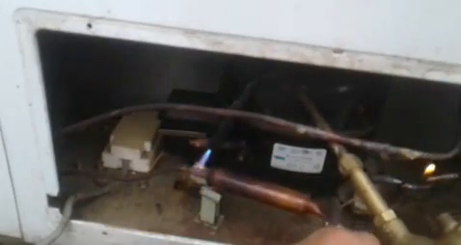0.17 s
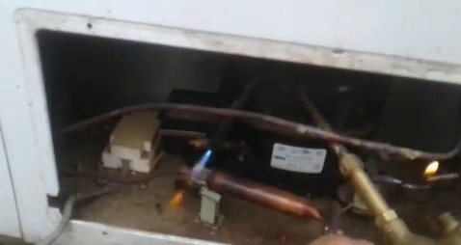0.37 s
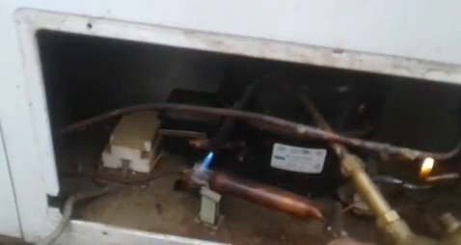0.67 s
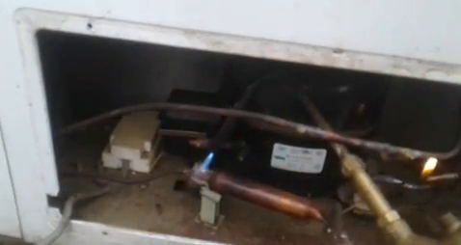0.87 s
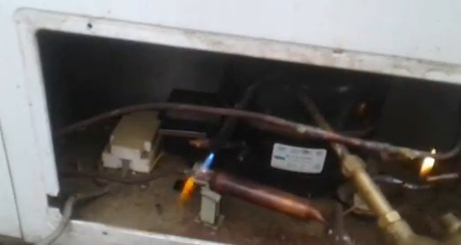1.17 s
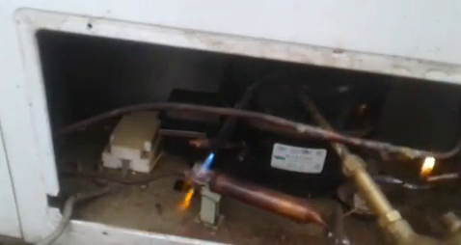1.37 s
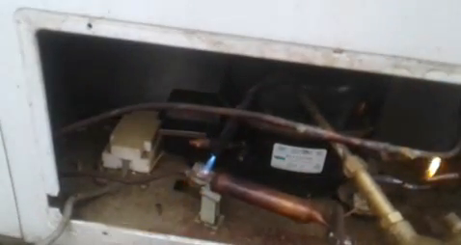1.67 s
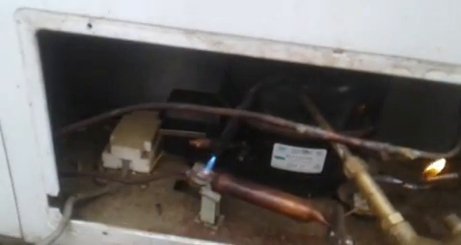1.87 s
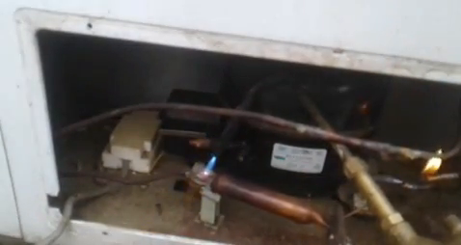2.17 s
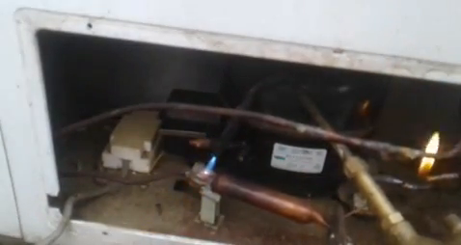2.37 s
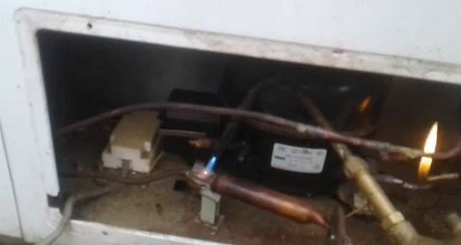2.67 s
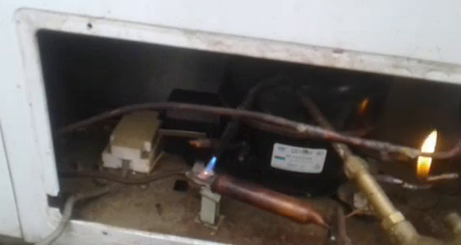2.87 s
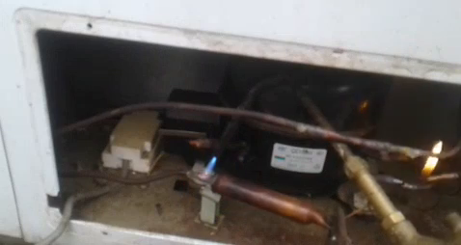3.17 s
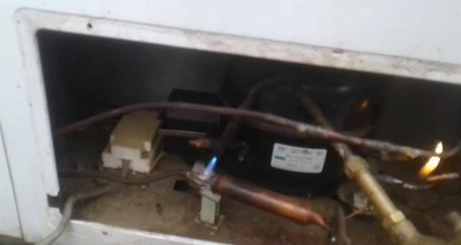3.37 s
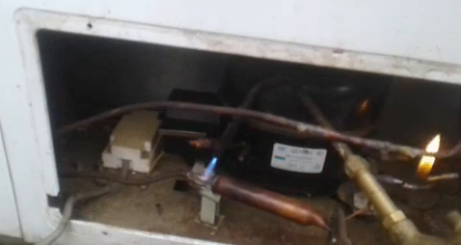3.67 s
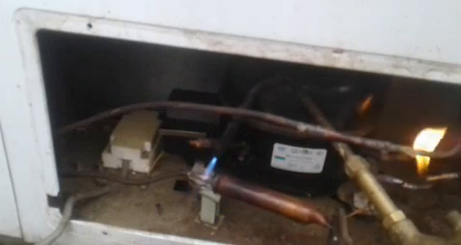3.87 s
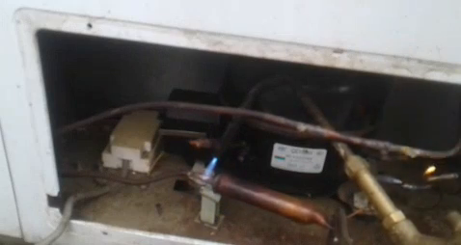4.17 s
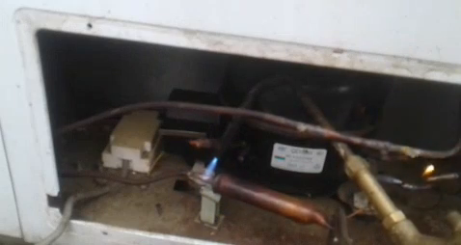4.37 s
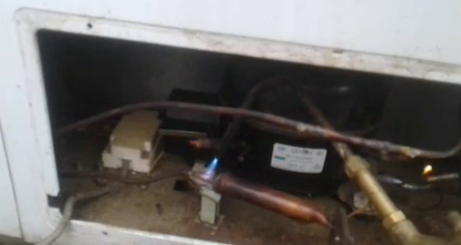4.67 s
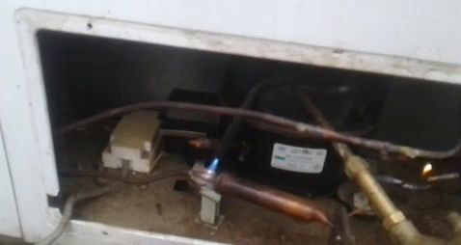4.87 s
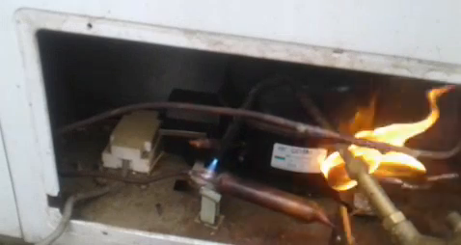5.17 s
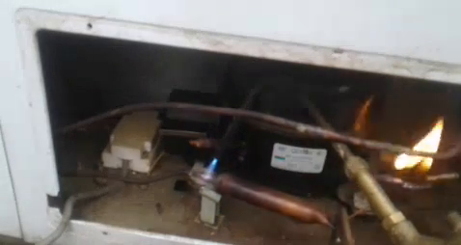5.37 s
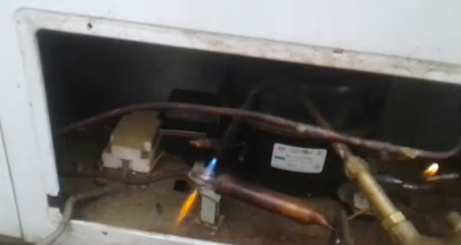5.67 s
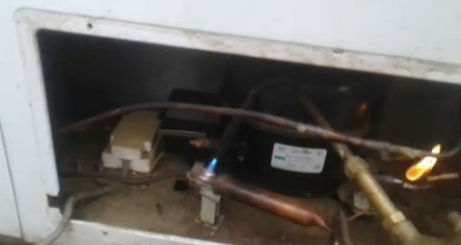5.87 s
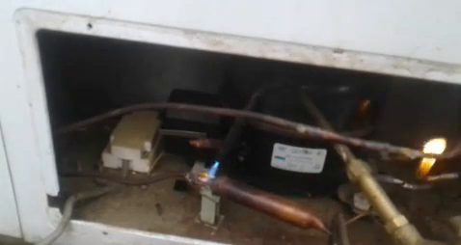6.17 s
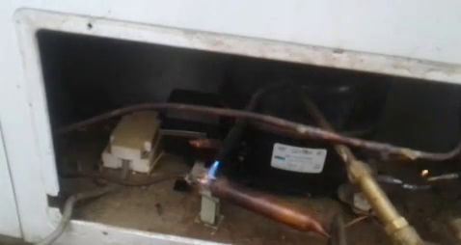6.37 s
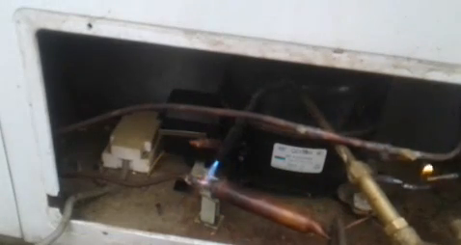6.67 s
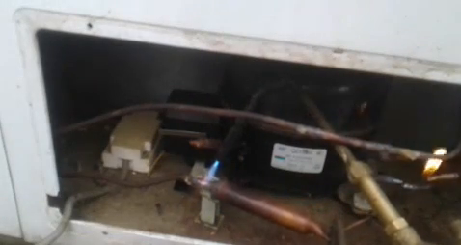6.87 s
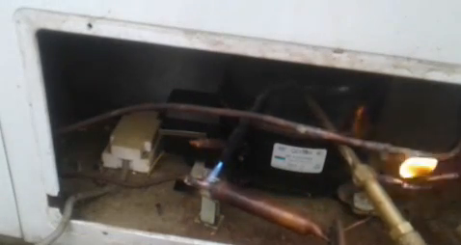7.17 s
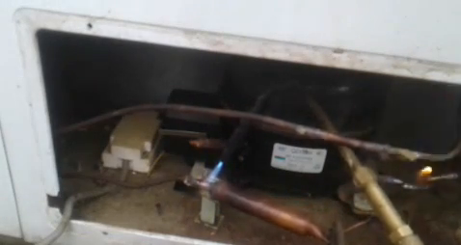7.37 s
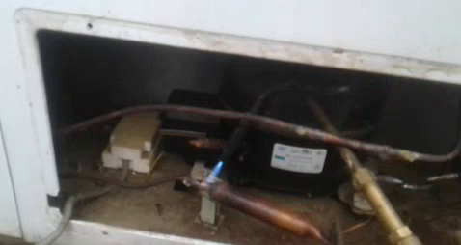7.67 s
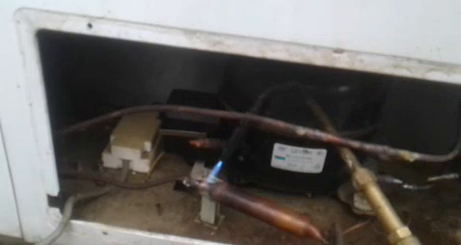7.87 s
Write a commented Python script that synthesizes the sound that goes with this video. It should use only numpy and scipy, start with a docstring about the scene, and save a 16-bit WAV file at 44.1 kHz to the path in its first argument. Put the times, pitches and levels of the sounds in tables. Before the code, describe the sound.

From 0 to 8 seconds a gas torch burns continuously against copper pipework inside an open metal refrigeration compartment. The dominant sound is a dense, bright, high hiss with a sizzling edge and countless tiny spits, so it feels grainy rather than smooth. Far beneath are a thin midrange rush and a very soft, low, fluttering flame roar. Everything surges together by small amounts: a slight lift near 0.8, a dip around 1.1, quick wavers until 4.3, a livelier swell, dip and swell from 5.4 to 5.8, another lift near 7.2 and a sag at 7.9. Narrow whistling tints in the hiss swell and fade as the flame shifts, with subtle gliding hollow reflections. Extremely faint low puffs come near 1.7, 5.1, 7.5 and 7.8. The microphone is close, the sound centred, and the hiss never stops.

```python
"""A hand-held gas torch heats a copper pipe joint inside the open steel compartment of a refrigeration unit.
From the start the jet hisses, rushes and spits finely (turbulent noise with sharp impulses) and the flame
roars softly (low-band noise); all surge together, and compartment resonances and gliding echoes colour the jet.
As the torch creeps along the joint, pitches in the hiss swell and fade; four faint low puffs (short swells
of band noise) come near 1.7, 5.1, 7.5 and 7.8 s. One microphone, close by, feeds both channels."""
import sys
import numpy as np
from scipy import signal
from scipy.fft import rfft, irfft, next_fast_len
from scipy.io import wavfile
from scipy.ndimage import map_coordinates

SR = 44100
rng = np.random.default_rng(int(sys.argv[2]) if len(sys.argv) > 2 else 0)


def generate_wav(signal):
    """Clip the signal to [-1, 1] and save it as 16-bit WAV at the path in sys.argv[1]."""
    frames = np.transpose(np.atleast_2d(signal))
    scaled = np.clip(frames, -1, 1) * 32767
    pcm = np.round(scaled).astype(np.int16)
    wavfile.write(sys.argv[1], SR, pcm)


N = 352932
TIME = np.arange(N) / SR   # s

# strength of the flame, which surges and sinks as it licks round the joint: time_s, strength_db (0 = usual)
FLAME_STRENGTH = [(0.0, 0.2), (0.76, 1), (1.08, -1.8), (1.2, 0.2), (1.74, -1), (1.86, 1.1), (2.02, -0.8),
                  (2.54, 0), (2.64, -1.5), (2.86, 0.8), (2.98, -0.5), (3.32, 0.1), (3.54, -1), (3.88, 1.0),
                  (4.16, -0.4), (4.26, 1), (4.46, -0.4), (5.16, -0.3), (5.26, -1.3), (5.44, 1.8),
                  (5.56, -1.6), (5.74, 2), (5.84, -0.1), (6.12, -0.6), (7.06, -0.25), (7.24, 1.5),
                  (7.88, -1.3), (7.98, 0.4)]
# the torch creeps along the joint, now faster, now slower: time_s, place_0_to_1
TORCH_PLACE = [(0, 0.1), (.5, 0.16), (1.5, 0.18), (1.9, 0.31), (3.2, 0.41), (3.7, 0.55), (5.8, 0.57),
               (6.5, 0.8), (7.0, 0.76), (7.25, 0.86), (8, 0.95)]
# spectrum of the free jet: frequency_hz, level_db
JET_SPECTRUM = [(200, -25.5), (380, -20.5), (480, -25), (650, -12), (1000, -17), (2000, -24), (3200, -12.5),
                (5000, -6.5), (6500, -1.5), (8000, -3), (10000, -1), (13000, -0.3), (15600, 0.5)]
# pitches that swell or fade when the jet meets one place on the joint: place_0_to_1, pitch_hz, width_hz, change_db
PLACE_PITCHES = [(.06, 6740, 260, 5.5), (.09, 7360, 180, 4), (.06, 5380, 160, -8), (.11, 6160, 170, -5),
                 (.17, 11430, 230, 7), (.32, 11580, 380, -10), (.58, 6860, 326, -5), (.58, 9500, 350, -3.5),
                 (.59, 12700, 530, 1), (.74, 14300, 160, 7), (.88, 8100, 160, -8.5), (.89, 5500, 280, 4),
                 (.9, 7300, 300, -6.5), (.96, 13240, 420, 9), (.99, 12600, 380, -6), (1, 4420, 140, 2.5),
                 (1, 10960, 190, 7.5)]
# resonances of the compartment: pitch_hz, width_hz, boost_db
COMPARTMENT_RESONANCES = [(692, 118, 3), (882, 120, 8), (1170, 227, 15), (1457, 43, 7.5), (1664, 130, 11.5),
                          (1949, 236, 14), (2089, 162, 13), (2545, 410, 11), (2784, 180, 15.5),
                          (3115, 154, 11.5), (3337, 57, 12), (3568, 89, 11.5), (3726, 282, 16),
                          (4090, 203, 10.5), (4368, 156, 10), (4685, 440, 10), (4870, 51, 12),
                          (5122, 89, 15.5), (5397, 143, 10), (5623, 152, 12), (6130, 310, 11),
                          (6610, 63, 8.5), (6915, 400, 9.5), (7320, 690, 5.5), (7993, 650, 7.5),
                          (8664, 156, 8), (8890, 74, 10), (9280, 155, 6.5), (11570, 356, 3.5),
                          (14200, 420, 3)]
# dips where reflections cancel, and one slight boost: pitch_hz, width_hz, change_db
REFLECTION_DIPS = [(614, 74, -13.5), (788, 120, -11.5), (1288, 95, -10.5), (1800, 50, -8),
                   (2000, 62, -12.5), (2385, 53, -9), (2986, 32, -19), (3760, 45, -15.5), (3880, 39, -5),
                   (4484, 30, -9), (4957, 220, -8), (5500, 40, 1.5), (7400, 51, -17), (10630, 99, -2.5),
                   (11210, 71, -12), (13700, 111, -10), (14816, 91, -1)]
# spectrum of the combustion roar: frequency_hz, level_db
ROAR_SPECTRUM = [(20, -36), (40, -30), (65, -21), (100, -14), (160, -7), (205, -1.5), (250, 2), (295, 2),
                 (330, -6), (390, -16.5), (480, -23.5), (700, -24), (1500, -67)]
# soft low puffs: centre_s, pitch_hz, width_hz, length_s, level_db
SOFT_PUFFS = [(1.73, 480, 100, .028, -60), (5.09, 470, 160, .013, -57.5), (7.45, 450, 130, .012, -59.5),
              (7.823, 90, 60, .009, -54)]

PLACE_REACH = 0.12   # spread in place over which a pitch is still caught
# base levels in dB; FOLLOWS is dB per dB of flame strength, greatest for the big slow eddies of the roar
HISS_DB, HISS_FOLLOWS = -28, 0.62
SIZZLE_DB, SIZZLE_FOLLOWS = -28.5, 0.78
RUSH_DB, RUSH_FOLLOWS = -46, 1.0
ROAR_DB, ROAR_FOLLOWS = -53.5, 2.3
HISS_FADE_DB = -1.27   # change of the hiss as the torch goes from place 0 to 1
RUSH_EDGE_DB = 2.5   # the rush is louder at either edge of the joint than at its middle
ROAR_FLUTTER_DB, ROAR_FLUTTER_HZ = 0.84, 9.7   # the roar also flutters by itself
CUTOFF_HZ = 15750


def from_db(db):
    """Logarithmic level: decibels become an amplitude gain."""
    return 10 ** (np.asarray(db) / 20)


def rms_one(x):
    """Normalisation: scale a signal to an rms of 1."""
    return x / np.sqrt(np.mean(x ** 2) + 1e-20)


def in_time(rows):
    """Linear interpolation: the value of a (time, value) curve at every sample."""
    times_s, values = np.transpose(rows)
    return np.interp(TIME, times_s, values)


def drift(rate_hz):
    """Low-passed noise: a smooth random curve of rms 1 that changes about rate_hz times a second."""
    step = 20   # samples between computed points
    settling = 8000   # points dropped while the filter settles
    pole = np.exp(-2 * np.pi * step * rate_hz / SR)
    noise = rng.standard_normal(N // step + settling + 2)
    slow = signal.lfilter([1], [1, -2 * pole, pole * pole], noise)[settling:]
    return np.interp(np.arange(N) / step, np.arange(len(slow)), rms_one(slow))


def shaped(x, gain_at):
    """Linear filtering: multiply the spectrum by a gain given as a function of frequency."""
    size = next_fast_len(N + SR // 10)
    hz = np.maximum(np.fft.rfftfreq(size, 1 / SR), 1)
    return irfft(rfft(x, size) * gain_at(hz), size)[:N]


def coloured(x, spectrum):
    """Spectral colouring: filter by (Hz, dB) points joined along log frequency."""
    points_hz, db = np.transpose(spectrum)
    return shaped(x, lambda hz: from_db(np.interp(np.log(hz), np.log(points_hz), db)))


def bell(x, pitch_hz, width_hz, db):
    """Second-order resonance: one peak (dB above 0) or dip (dB below 0)."""
    gain = from_db(db / 2)
    k = np.tan(np.pi * abs(width_hz) / SR)
    middle = -2 * np.cos(2 * np.pi * pitch_hz / SR)
    zeros = [1 + k * gain, middle, 1 - k * gain]
    poles = [1 + k / gain, middle, 1 - k / gain]
    return signal.lfilter(zeros, poles, x)


def turbulence(eddy_db, eddy_rate_hz, spits_per_s, spit_db, spit_spread_db):
    """Turbulent mixing: noise swells in quick eddies, with sharp one-sample spits at random among them."""
    eddies = rng.standard_normal(N) * from_db(eddy_db * drift(eddy_rate_hz))
    sizes = from_db(spit_db + spit_spread_db * np.minimum(rng.exponential(1, N), 4))
    happens = rng.random(N) < spits_per_s / SR
    spits = happens * sizes * rng.choice([-1, 1], N)
    return rms_one(eddies + spits)


def wall_echoes(x, strength, above_hz, sway_s, near_s, far_s, count):
    """Comb interference: treble echoes off pipes and walls glide as the swaying hand changes their paths."""
    out = x.copy()
    treble = shaped(x, lambda hz: 1 / np.sqrt(1 + (above_hz / hz) ** 4))
    for k, delay_s in enumerate(np.geomspace(near_s, far_s, count)):
        path_s = delay_s * rng.uniform(.9, 1.1) + sway_s * drift(.25)
        echo = map_coordinates(treble, [(TIME - path_s) * SR], order=3, mode="wrap")
        out += (-1) ** k * strength * echo   # signs alternate
    return rms_one(out)


def aimed(x, place):
    """Position-dependent resonance: a pitch changes the more, the nearer the jet is to its place on the joint."""
    for best_place, pitch_hz, width_hz, db in PLACE_PITCHES:
        share = np.exp(-.5 * ((place - best_place) / PLACE_REACH) ** 2)
        x = x + share * (bell(x, pitch_hz, width_hz, db) - x)
    return x


def jet(place, hiss_db, sizzle_db, rush_db, flutter_db, flutter_hz):
    """Jet noise in a cavity: turbulence is resonated, then large, middle and small eddies get their own levels."""
    x = turbulence(eddy_db=1.4, eddy_rate_hz=360, spits_per_s=260, spit_db=8.5, spit_spread_db=2.0)
    x = wall_echoes(x, strength=.155, above_hz=4800, sway_s=.000055, near_s=.0006, far_s=.008, count=13)
    x = aimed(coloured(x, JET_SPECTRUM), place)
    for pitch_hz, width_hz, db in list(COMPARTMENT_RESONANCES) + list(REFLECTION_DIPS):
        x = bell(x, pitch_hz, width_hz, db)
    rush = shaped(x, lambda hz: 1 / (1 + (hz / 2450) ** 24))   # large eddies, low band
    sizzle = shaped(x, lambda hz: 1 / (1 + (9100 / hz) ** 24))   # small eddies, high band
    hiss = x - rush - sizzle   # middle band
    shared_flutter = flutter_db * drift(flutter_hz)
    out = np.zeros(N)
    for part, level_db in ((rush, rush_db), (hiss, hiss_db), (sizzle, sizzle_db)):
        own_flutter = 0.41 * drift(60)   # quicker, separate for each band
        out += rms_one(part) * from_db(level_db + shared_flutter + own_flutter)
    return out


def roar(roar_db):
    """Combustion noise: unsteady burning booms in the lowest resonance of the compartment."""
    boom = rms_one(coloured(rng.standard_normal(N), ROAR_SPECTRUM))
    flutter = ROAR_FLUTTER_DB * drift(ROAR_FLUTTER_HZ)
    return from_db(roar_db + flutter) * boom


def puffs():
    """Amplitude-modulated band noise: each puff is low noise under a short bell-shaped swell."""
    out = np.zeros(N)
    for at_s, pitch_hz, width_hz, length_s, db in SOFT_PUFFS:
        swell = np.exp(-.5 * ((TIME - at_s) / length_s) ** 2)
        noise = shaped(rng.standard_normal(N), lambda hz: np.exp(-2 * ((hz - pitch_hz) / width_hz) ** 2))
        puff = swell * noise
        # the level is the rms of the noise under the swell
        out += from_db(db) * puff * np.sqrt(np.sum(swell ** 2) / np.sum(puff ** 2))
    return out


def scene():
    """Superposition: flame strength drives jet and roar, torch place colours the jet; both channels are equal."""
    strength_db = in_time(FLAME_STRENGTH)
    place = in_time(TORCH_PLACE)
    edge = (2 * place - 1) ** 2   # 0 at the middle of the joint, 1 at its ends
    torch = jet(place,
                hiss_db=HISS_DB + HISS_FOLLOWS * strength_db + HISS_FADE_DB * place,
                sizzle_db=SIZZLE_DB + SIZZLE_FOLLOWS * strength_db,
                rush_db=RUSH_DB + RUSH_FOLLOWS * strength_db + RUSH_EDGE_DB * edge,
                flutter_db=0.59, flutter_hz=16.4)
    flame = roar(ROAR_DB + ROAR_FOLLOWS * strength_db)
    return np.tile(torch + flame + puffs(), (2, 1))


def record(dry):
    """Band limiting: a steep elliptic low-pass cuts off the top."""
    low_pass = signal.ellip(14, .1, 80, CUTOFF_HZ, fs=SR, output="sos")
    return signal.sosfilt(low_pass, dry)


dry = scene()
out = record(dry)
generate_wav(out)
```